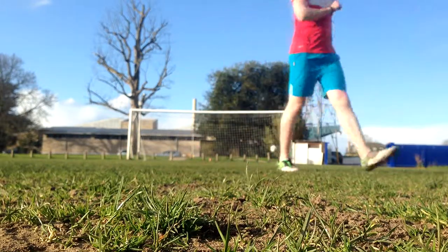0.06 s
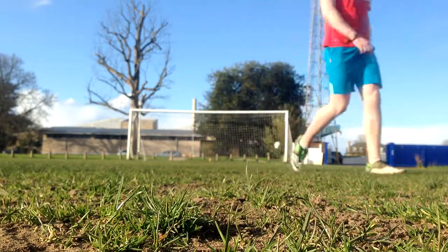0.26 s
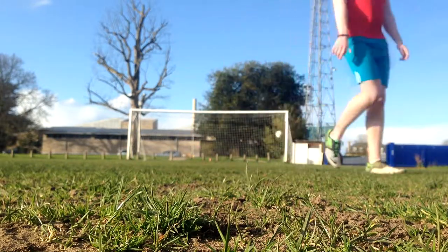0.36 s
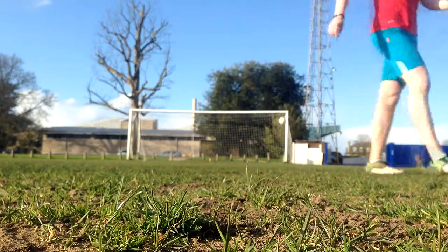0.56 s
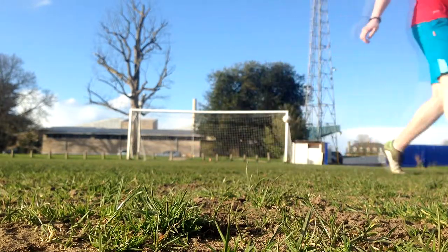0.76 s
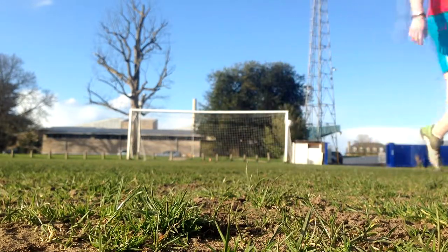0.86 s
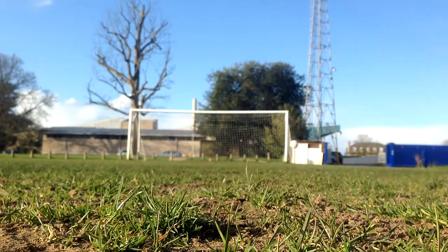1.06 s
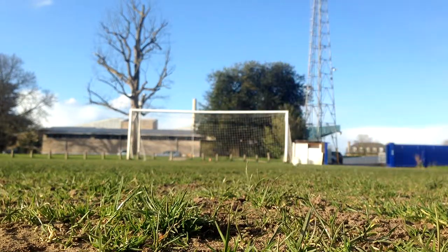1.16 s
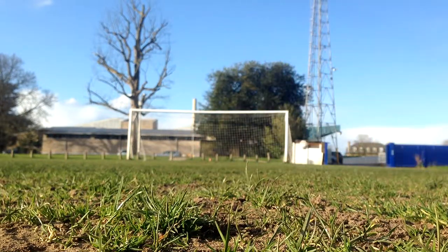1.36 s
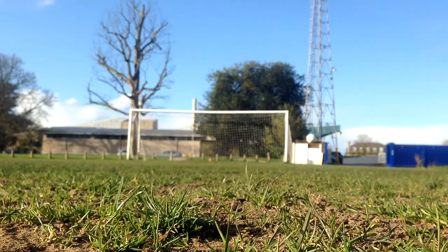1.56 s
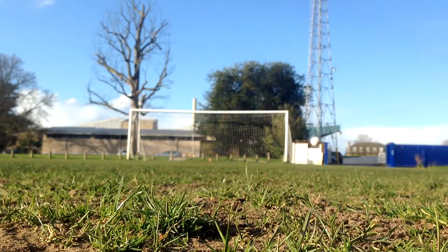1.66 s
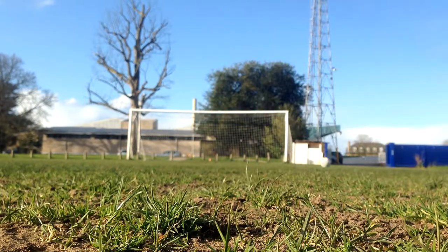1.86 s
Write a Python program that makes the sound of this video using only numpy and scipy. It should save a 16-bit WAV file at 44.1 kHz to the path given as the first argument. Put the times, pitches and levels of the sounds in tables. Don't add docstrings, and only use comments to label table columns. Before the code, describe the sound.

A football hits grass with one hard, dull thump and a skin slap, then about a second later bounces more softly and lightly knocks a panel. Open pitch, distant traffic rumble, light wind, slight microphone hiss.

```python
import sys
import numpy as np
from scipy import signal
from scipy.io import wavfile
from scipy.ndimage import uniform_filter1d

SR = 44100
rng = np.random.default_rng(int(sys.argv[2]) if len(sys.argv) > 2 else 0)


def master_out(mix):
    frames = np.transpose(np.atleast_2d(mix))
    ceiling = np.clip(frames, -1, 1)
    pcm = np.round(ceiling * 32767).astype(np.int16)
    wavfile.write(sys.argv[1], SR, pcm)


def field_ratio(decibels):
    return 10 ** (np.asarray(decibels, dtype=float) / 20)


N = 83790

# band_hz, density_db [dB per Hz]
TRAFFIC_SPECTRUM = [(20, -23), (54, -5.5), (160, 0.5), (359, -15), (770, -19), (1250, -26.5), (2350, -35),
                    (2800, -68)]
# time_s, gust_db
WIND_GUSTS = [(0.0, -44.5), (0.57, -45.5), (1.0, -45.5), (1.502, -44), (1.9, -45.5)]
# start_s, level_db, ring_hz, t60_s
KNOCKS = [
    (1.4072, -41, 1910, 0.011),
    (1.406, -43, 1470, 0.019),
    (1.4092, -35.5, 750, .015),
    (1.4089, -34.5, 167, 0.042),
    (.512, -48, 686, .015),
    (0.934, -37.5, 106, 0.12),
    (1.784, -55.5, 2250, 0.045),
    (1.801, -57, 2400, 0.014),
]
# start_s, level_db, cavity_hz, t60_s
SKIN_SLAPS = [
    (.2233, -20.5, 1080, 0.015),
    (.2264, -37, 785, 0.013),
    (.2351, -31.5, 953, 0.027),
    (.2376, -30.5, 824, .02),
    (1.2557, -40, 1210, 0.0068),
    (1.2566, -29.5, 1250, .015),
    (1.2575, -27, 1040, 0.0065),
    (1.2599, -31.5, 846, 0.017),
    (1.2686, -30.5, 780, 0.011),
]
# ring_hz, relative_db, t60_s
SKIN_MODES = [(520, -18, .02), (1900, -19, .03)]
# touch_s, squash_db, deepest_squash_s, rebound_s, air_ahead_db
BALL_BOUNCES = [
    (.2239, -12.5, .0041, .0061, -19),
    (1.2559, -24, .0050, .0052, -36),
]

TRAFFIC_DB, SWELL_DB, FLICKER_DB, GUSTY_BELOW_HZ = -43.5, .5, 1.5, 250
LEAD_S = .006
PUSH_S, REBOUND_SHARE, LOBE_POWER, SUCK_POWER = .0041, .85, .55, 1.2
AHEAD_S, SPRING_BACK_DB = .0011, -16
RATTLE_DB, RATTLE_HZ, RATTLE_WIDTH_HZ, RATTLE_T60_S = -21, 870, 660, 0.1
GRASS_HZ = 2090
HISS_DB, HISS_TILT, MIC_LOW_HZ = -65, 0.32, 7.8
TOP_HZ, EDGE_HZ, EDGE_RATE_HZ = 15250, 15000, 16


def level(x, db):
    return x * field_ratio(db) / np.sqrt(np.mean(x ** 2))


def peak(x, db):
    return x * field_ratio(db) / np.max(np.abs(x))


def band(x, hz, width):
    return signal.lfilter(*signal.iirpeak(hz, hz / width, fs=SR), x)


def ring(x, hz, t60):
    t = np.arange(len(x)) / SR
    mode = np.sin(2 * np.pi * hz * t) * 1000. ** (-t / t60)
    return np.convolve(x, mode)[:len(x)]


def add(out, x, s):
    i = int(s * SR)
    out[i:i + len(x)] += x[:N - i]


def walk(rate):
    k = int(SR / rate)
    steps = np.repeat(rng.standard_normal(N // k + 1), k)
    return 2.0 * uniform_filter1d(uniform_filter1d(steps, k), k)[:N]


def traffic():
    out, swell = 0, walk(0.82)
    table_hz, table_db = np.array(TRAFFIC_SPECTRUM).T
    gust = np.interp(np.arange(N) / SR, *np.array(WIND_GUSTS).T)
    gust = gust - gust.mean()
    for hz in 25 * 2 ** (np.arange(21) / 3):
        steady_db = np.interp(np.log(hz), np.log(table_hz), table_db)
        gusty = min(1, GUSTY_BELOW_HZ / hz)
        db = steady_db + SWELL_DB * swell + gusty * (gust + FLICKER_DB * walk(8.65))
        noise = band(band(rng.standard_normal(N), hz, hz / 3), hz, hz / 3)
        out = out + field_ratio(db) * noise
    return level(out, TRAFFIC_DB)


def tap(db, hz, t60):
    push = np.zeros(SR // 10)
    push[:17] = np.hanning(17)
    return -peak(ring(push, hz, t60), db)


def slap(db, hz, t60):
    cavity = tap(db, hz, t60)
    skin = sum(tap(db + skin_db, skin_hz, skin_t60) for skin_hz, skin_db, skin_t60 in SKIN_MODES)
    return cavity + skin


def lobe(t, start, span, power=LOBE_POWER):
    phase = np.clip((t - start) / span, 0, 1)
    return np.sin(np.pi * phase).clip(0) ** power * PUSH_S / span


def bounce(squash_db, deep, rebound, ahead_db):
    t = np.arange(SR // 8) / SR - LEAD_S
    refill = PUSH_S + deep
    end = refill + rebound
    suck = (1 + REBOUND_SHARE) * lobe(t, PUSH_S, deep, SUCK_POWER) * 0.79
    thump = lobe(t, 0, PUSH_S) - suck + REBOUND_SHARE * lobe(t, refill, rebound)
    spring_back = field_ratio(squash_db + SPRING_BACK_DB) * lobe(t, end - .0005, 0.0021)
    thump = peak(thump, squash_db) - spring_back
    ahead = field_ratio(ahead_db) * np.exp(np.minimum(t, 0) / AHEAD_S) * (t < 0)
    rattle = band(rng.standard_normal(len(t)), RATTLE_HZ, RATTLE_WIDTH_HZ)
    rattle = rattle * (t > 0) * 1000. ** (-t / RATTLE_T60_S)
    return uniform_filter1d(thump - ahead, size=21) + peak(rattle, squash_db + RATTLE_DB)


def scene():
    out, ball = traffic(), np.zeros(N)
    for s, *knock in KNOCKS:
        add(out, tap(*knock), s)
    for s, *blow in SKIN_SLAPS:
        add(ball, slap(*blow), s)
    for s, *blow in BALL_BOUNCES:
        add(ball, bounce(*blow), s - LEAD_S)
    grass = signal.butter(7, GRASS_HZ, fs=SR, output="sos")
    return (out + signal.sosfiltfilt(grass, ball))[None]


def lowpass(x, hz):
    return signal.sosfiltfilt(signal.ellip(8, .1, 40, hz, fs=SR, output="sos"), x)


def roll_off(x):
    return signal.sosfilt(signal.butter(12, 15480, fs=SR, output="sos"), x)


def record(dry):
    hiss = level(signal.lfilter([1], [1, -HISS_TILT], rng.standard_normal(N)), HISS_DB)
    bass_cut = signal.butter(1, MIC_LOW_HZ, "high", fs=SR, output="sos")
    x = signal.sosfilt(bass_cut, dry) + hiss
    full, cut = lowpass(x, TOP_HZ), lowpass(x, EDGE_HZ)
    gate = uniform_filter1d(1. * (walk(EDGE_RATE_HZ) > 0), size=600)
    return roll_off(cut + gate * (full - cut))


dry = scene()
out = record(dry)
master_out(out)
```